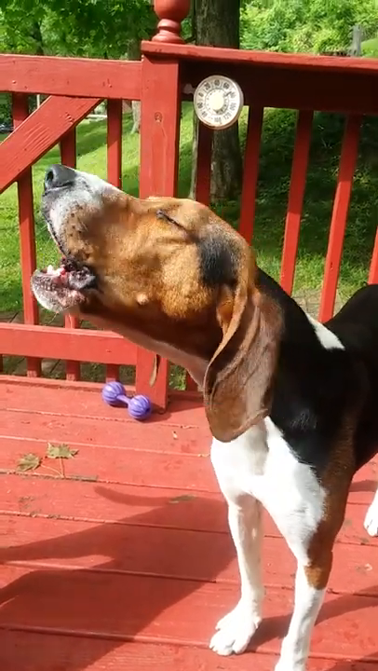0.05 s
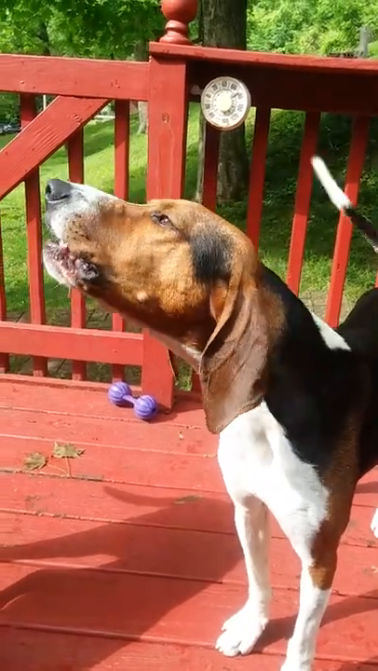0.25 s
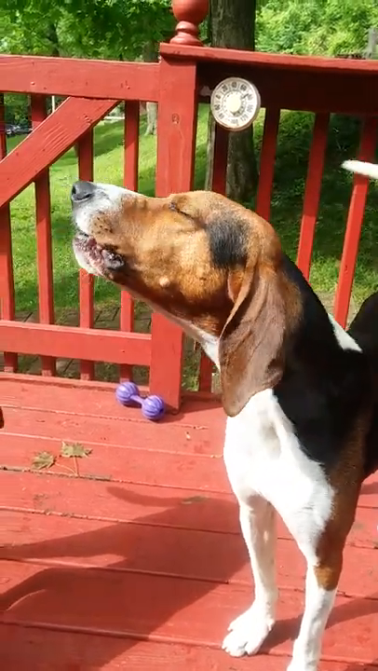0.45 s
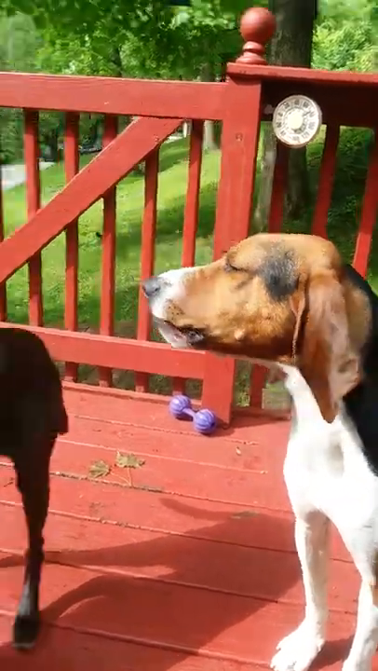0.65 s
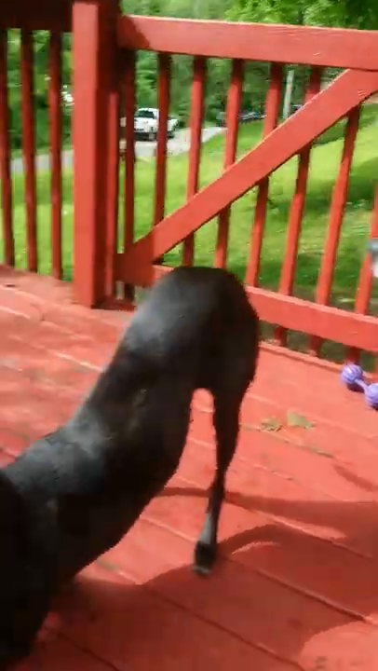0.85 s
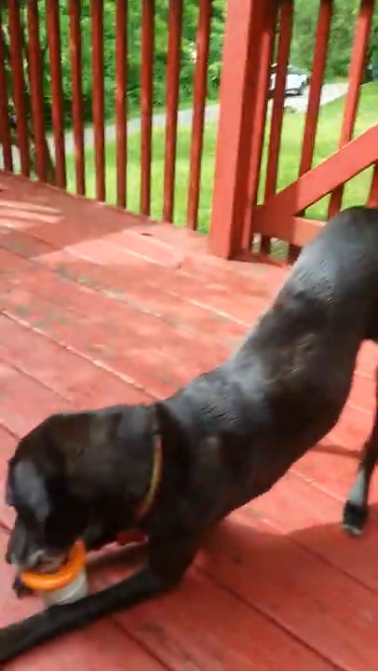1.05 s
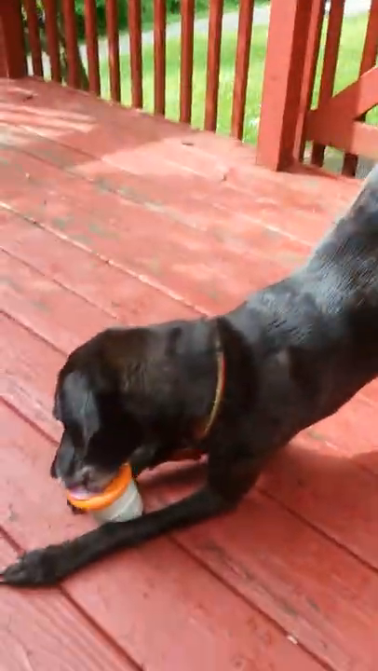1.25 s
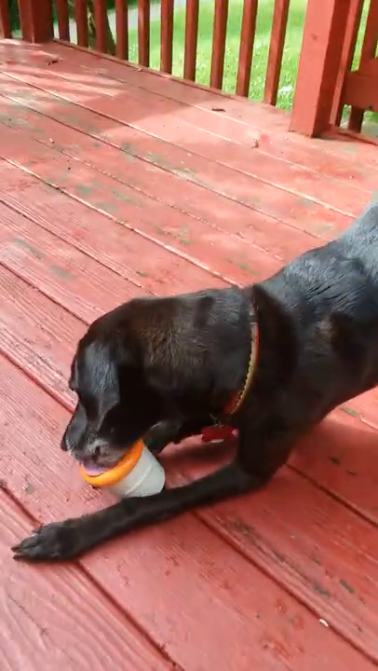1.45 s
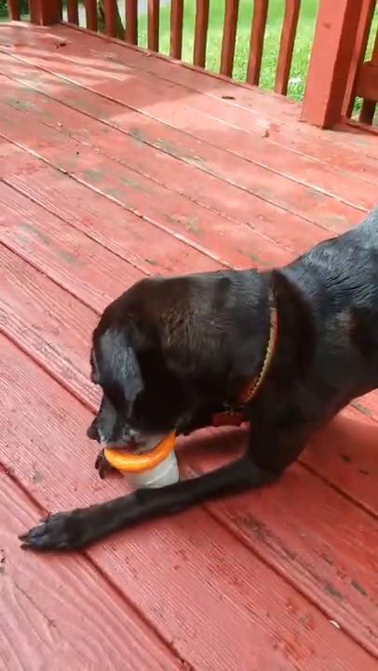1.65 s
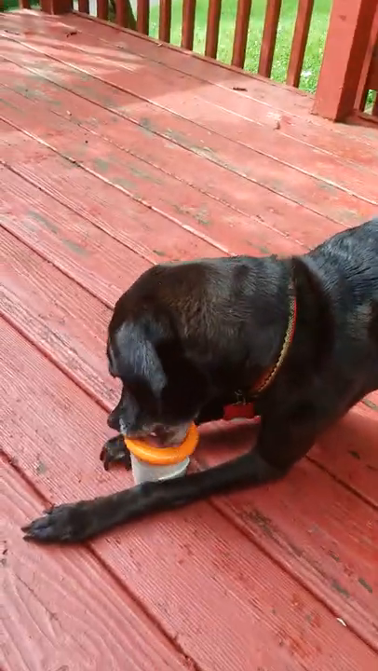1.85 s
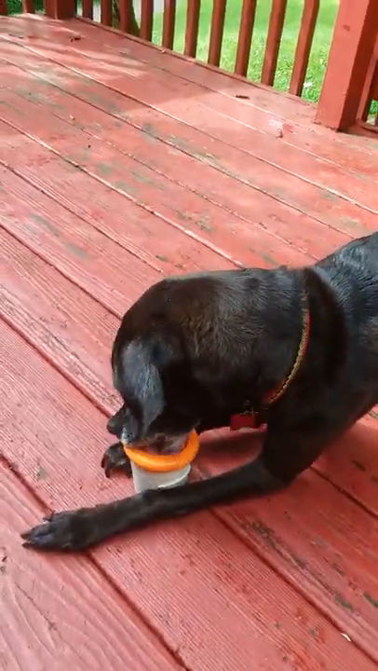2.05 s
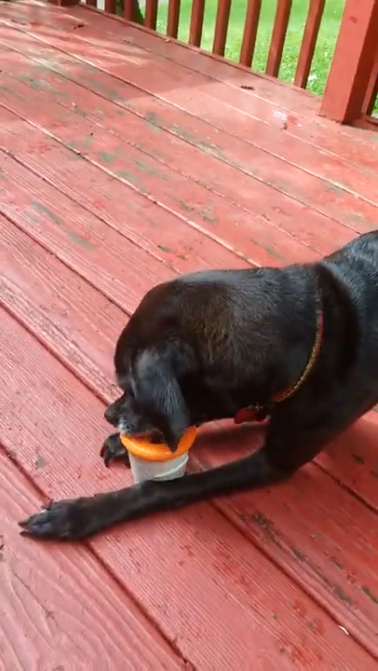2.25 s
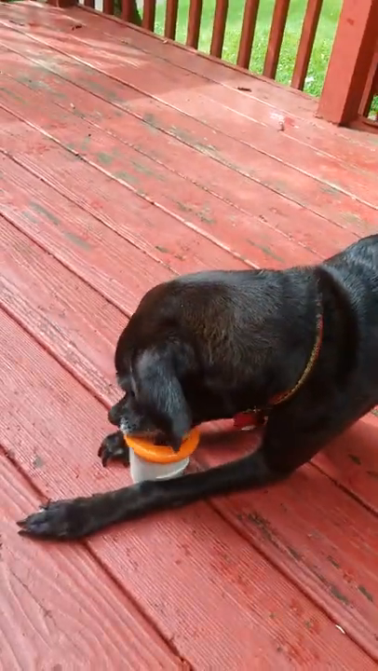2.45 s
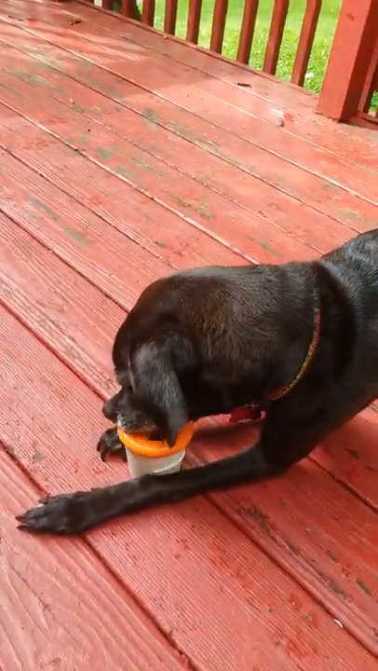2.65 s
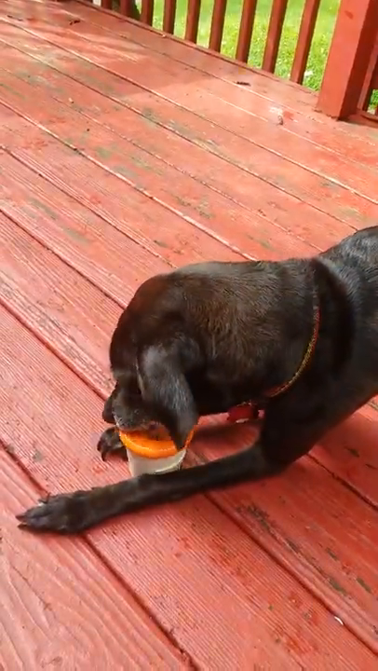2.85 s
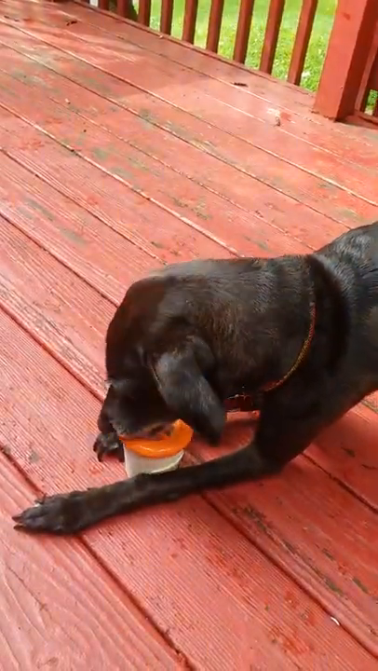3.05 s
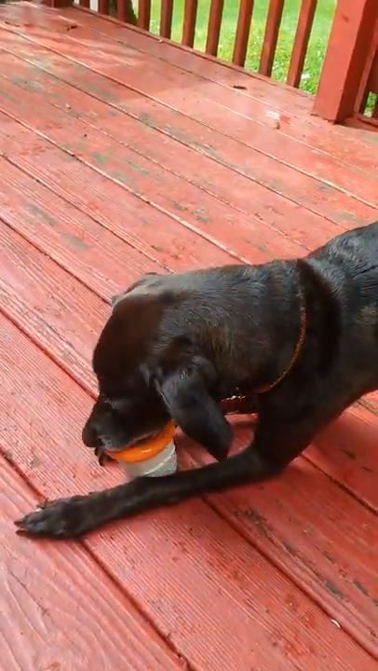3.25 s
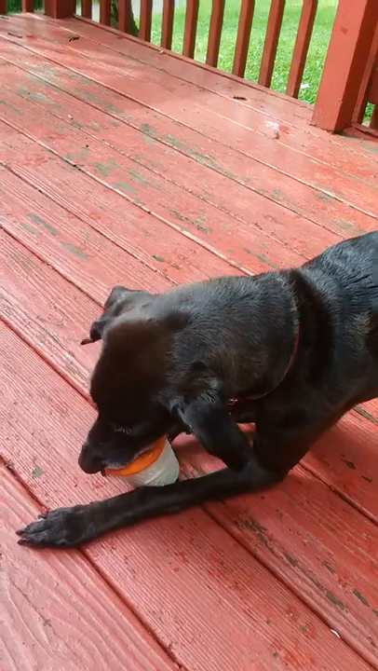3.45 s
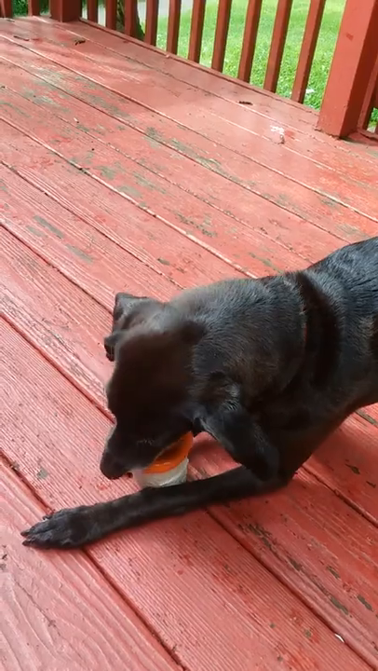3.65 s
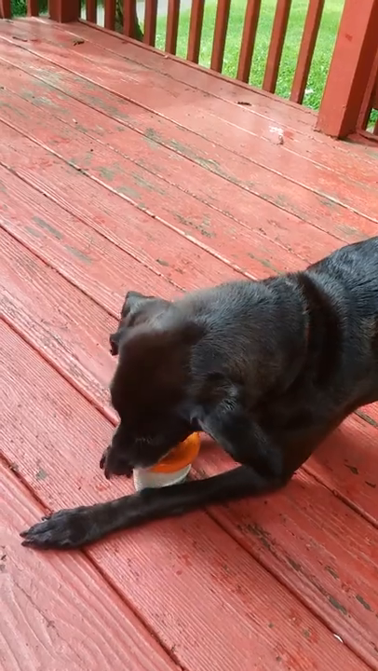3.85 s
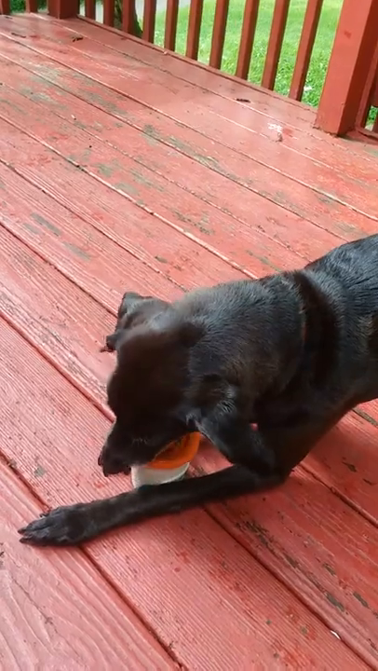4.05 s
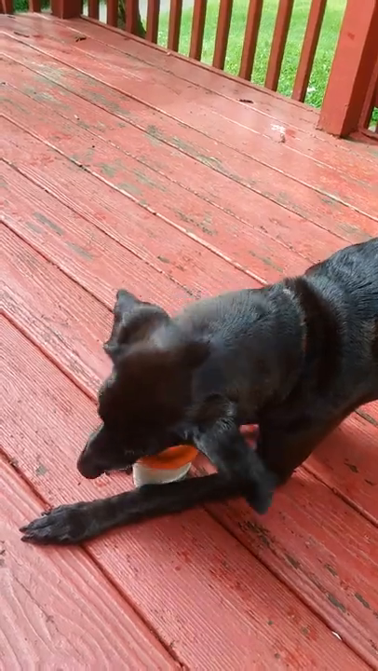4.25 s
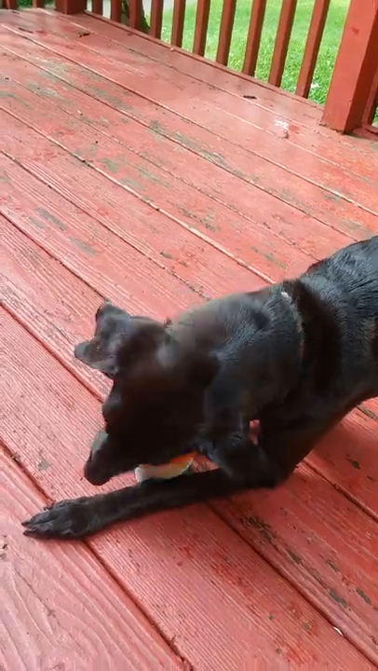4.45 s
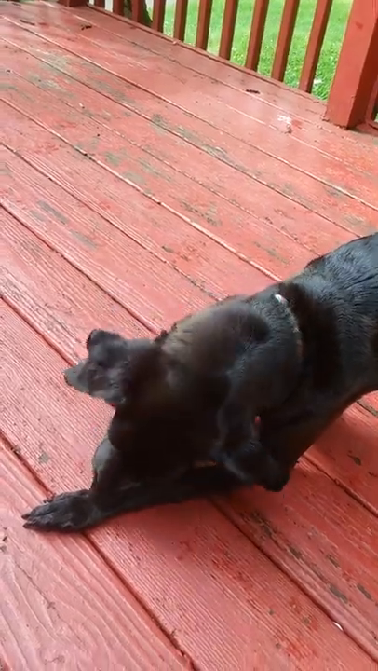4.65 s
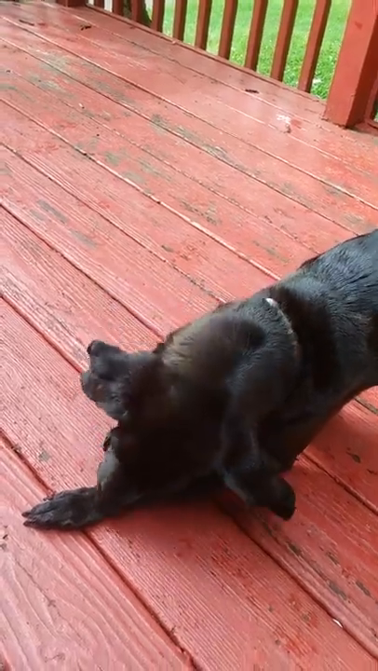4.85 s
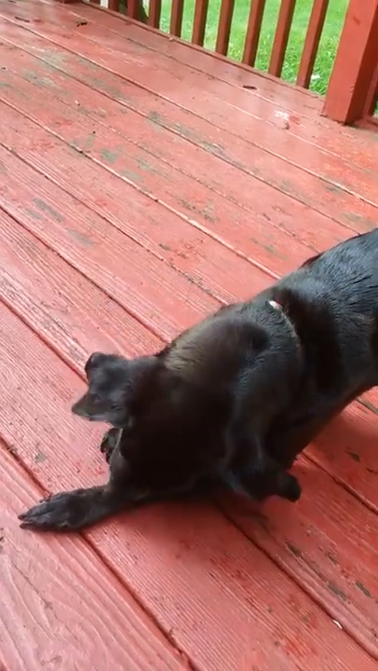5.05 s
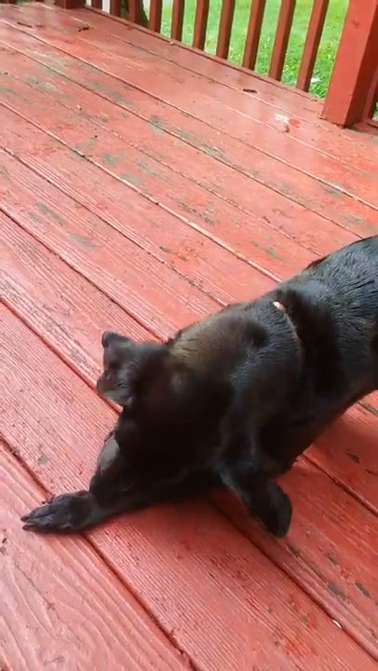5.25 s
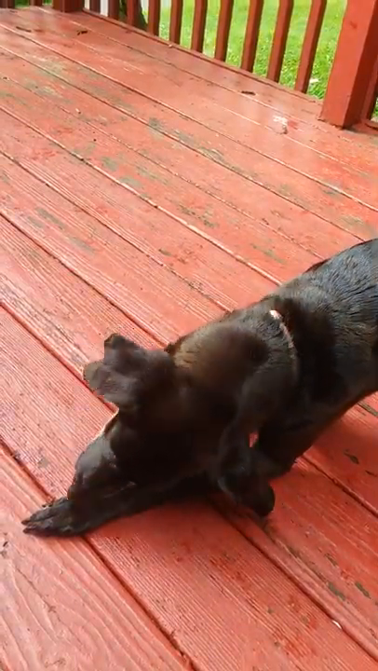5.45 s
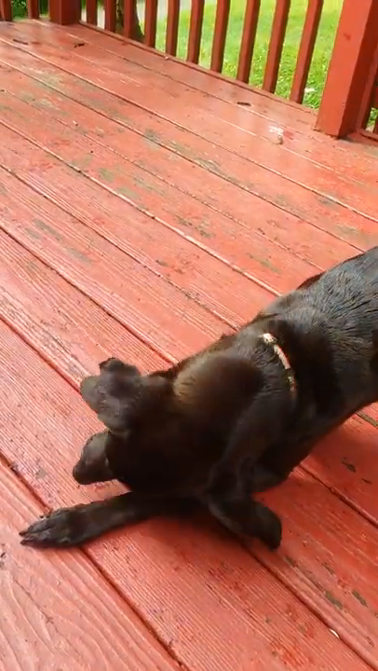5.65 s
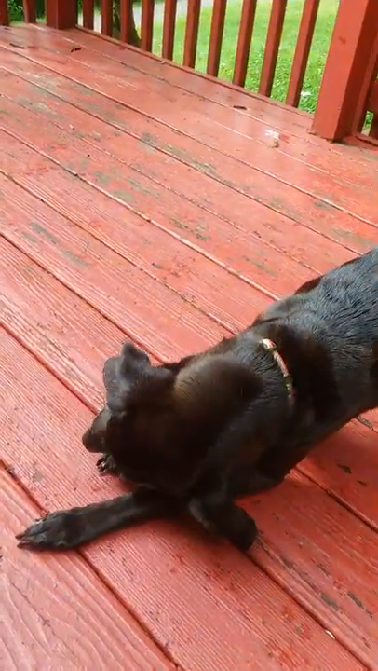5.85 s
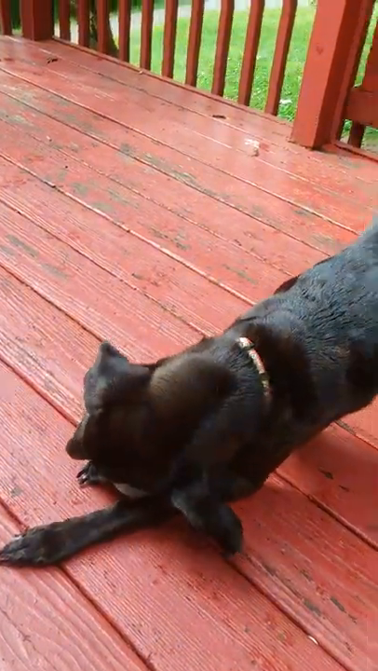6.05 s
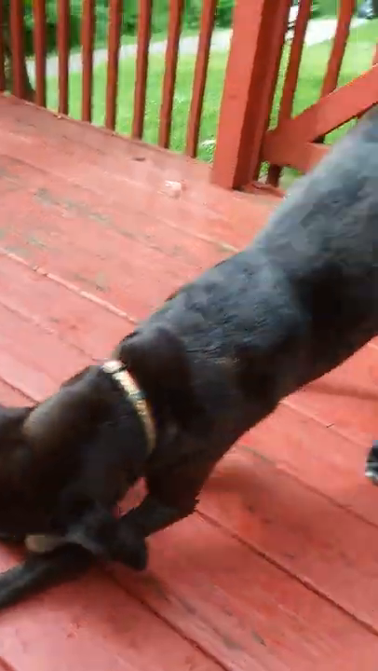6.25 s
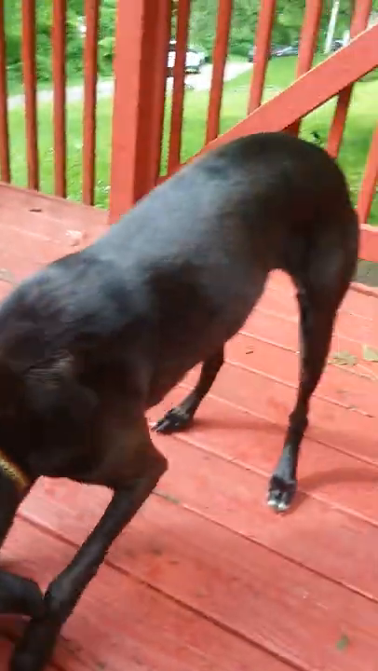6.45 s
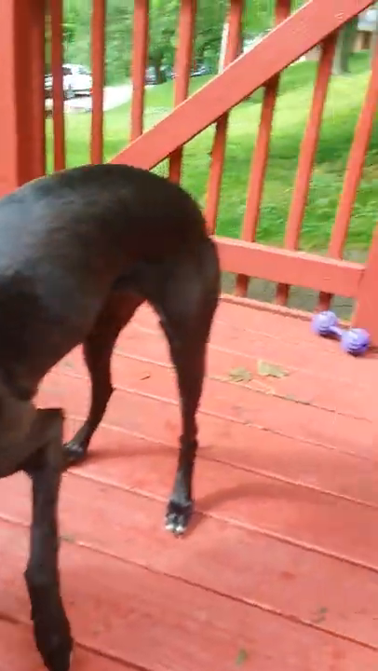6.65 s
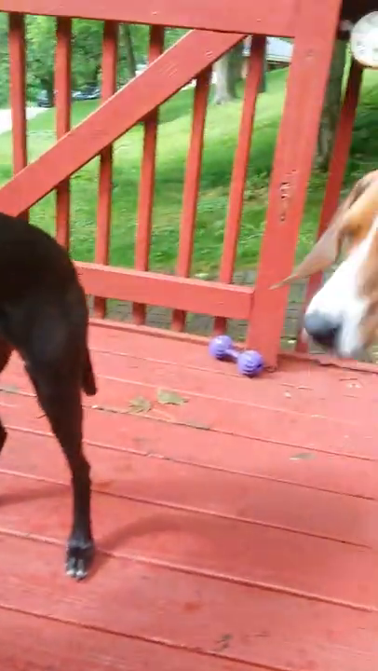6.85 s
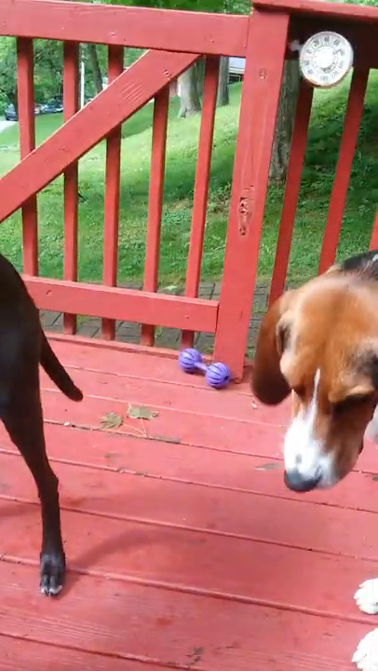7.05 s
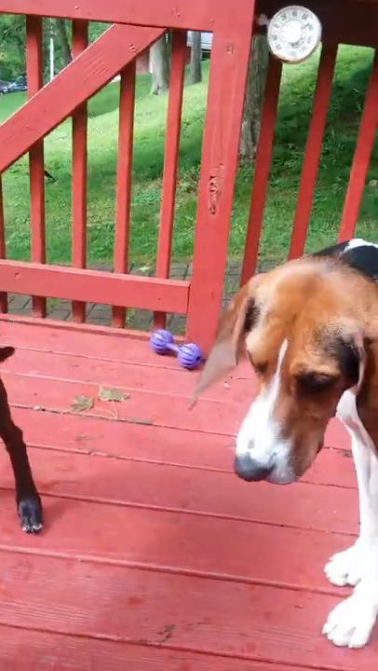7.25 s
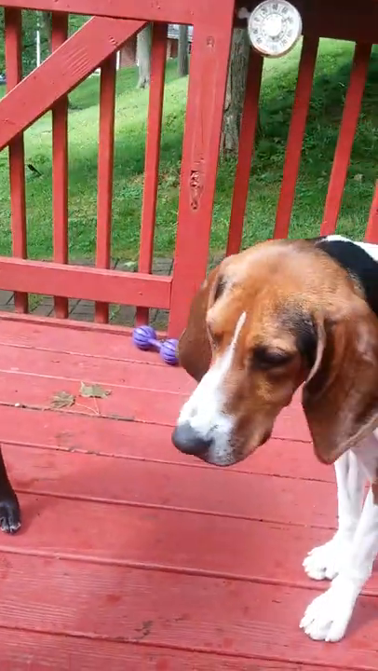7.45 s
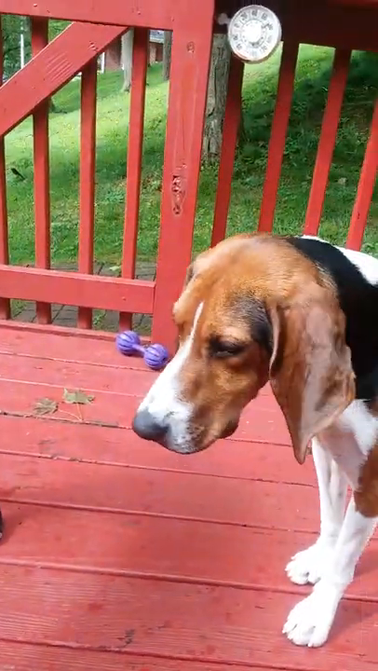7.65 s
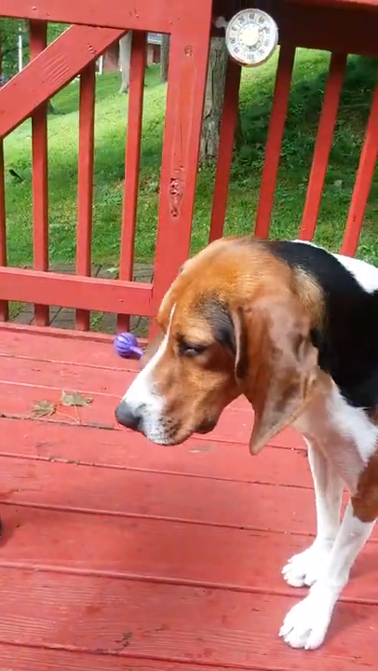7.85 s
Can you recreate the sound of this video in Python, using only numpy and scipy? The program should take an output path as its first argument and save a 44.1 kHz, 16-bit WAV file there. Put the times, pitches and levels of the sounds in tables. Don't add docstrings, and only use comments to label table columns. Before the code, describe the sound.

At 0 s a hound's loud bay, pitched around 410 Hz, is already under way very close; by 0.2 s it cracks into tiny squeaks and dies, leaving a faint tree echo. The automatic level keeps the yard low for about a second, then distant road rumble and wavering engine drone rise. Short falling bird chips repeat evenly until about 2.3 s, with rising chips, thin high seeps and echoing fluted phrases. Small claw ticks and woody knocks come at 0.8-1.5, 2.4-3.0, 4.0 and 4.4 s. Around 3.05 s a plastic cup scrapes and skips with a quick hollow rattle. At 4.5 s a raspy indrawn breath leads to the second bay at 4.72 s: wide and brassy, flipping into a rounded hoot near 5.05, breaking to a rough croak by 5.4. The yard stays ducked until about 6.3 s, then rumble and bird phrases return, at 6.7 and 7.4 s, to the end near 8 s.

```python
import sys
import numpy as np
from scipy import signal
from scipy.fft import rfft, irfft
from scipy.io import wavfile
from scipy.ndimage import uniform_filter1d, minimum_filter1d

SR = 44100
rng = np.random.default_rng(int(sys.argv[2]) if len(sys.argv) > 2 else 0)


def generate_wav(signal):
    frames = np.transpose(np.atleast_2d(signal))
    scaled = np.clip(frames, -1, 1) * 32767
    pcm = np.round(scaled).astype(np.int16)
    wavfile.write(sys.argv[1], SR, pcm)


def makeup_ratio(level_db):
    decades = np.asarray(level_db, float) / 20
    return 10 ** decades


N = 348831

# (frequency [Hz], level [dB])
THROAT = [(1650, 0), (2060, -10), (2470, -18), (2850, -34), (3300, -30), (4200, -44), (4950, -35),
          (5500, -34), (6200, -26), (7000, -38), (8000, -29), (9200, -47), (11000, -42), (13500, -38),
          (15700, -46)]
# (frequency [Hz], lead [rad])
PORT_LEADS = [
    [(100, 0), (410, .7), (820, .2), (1230, 1.8), (1640, 0), (2050, 1.8), (2500, 2.4), (5000, 1.5)],
    [(100, 0), (410, -.25), (820, 0), (1230, .9), (1640, 2.1), (2050, 1.9), (2500, 2.3), (5000, 1.5)],
]
# (frequency [Hz], ratio [dB])
PORT_BALANCES = [
    [(100, 0), (410, -2), (820, 0), (1230, 4), (1640, -1), (2050, 1), (2500, 7)],
    [(100, 0), (410, 0), (820, -1), (1230, -1), (1640, 1), (2050, 1), (2500, 3), (4000, 7), (9000, 4),
     (13000, 7)],
]
# (frequency [Hz], level re effort [dB])
WIDE_MOUTH = [(220, -8), (320, -14.5), (410, -8.5), (650, 3.5), (820, 4), (1000, 5), (1230, -2.5),
              (1640, -8.5)]
ROUNDED_MOUTH = [(220, -5.5), (450, 5), (900, -25.5), (1360, -22), (1800, -56)]
# (frequency [Hz], level re effort [dB])
ASIDE = [(450, -31.5), (900, -13), (1360, -10), (1800, -20.5)]
# (time [s], pitch [Hz], effort [dB], mouth opening [0-1], extra rasp [dB])
FIRST_BAY = [(0, 412.3, -11.5, 0.76, -1), (.045, 404, -13.5, .66, -1.5), (.07, 412.6, -14.5, .6, 0),
             (.096, 397.3, -16, 0.47, 0.5), (.128, 424.3, -14.5, 0.52, 2.5),
             (.157, 414.4, -17.5, 0.55, 4.5), (.172, 449, -17.5, 0.4, 5), (.184, 460, -18, 0.32, 0),
             (.192, 444, -30.5, 0.7, 11)]
BROKEN_TAIL = [(.2, 424, -24, 0.32, 14), (.213, 408.5, -32.5, 0.4, 17), (.225, 338.8, -39.5, 0.45, 20),
               (.275, 194.4, -53, 0.44, 20)]
SECOND_BAY = [(4.718, 329, -42.5, 1, 9), (4.733, 307.7, -15, 0.7, -3), (4.78, 373.5, -15.5, 0.7, -3),
              (4.819, 400, -13.5, .8, -5.5), (4.86, 413.9, -11.5, 0.9, -0.5), (4.93, 408.2, -10, 0.65, -3),
              (4.991, 410.7, -16, 0.6, -3.5), (5.03, 434, -13.5, 0.24, 2.5)]
HOOT = [(5.048, 436, -13, 0.058, 2), (5.058, 460, -10, 0.042, 2), (5.085, 452, -10.5, 0.037, 2.5),
        (5.1, 454.4, -10.5, 0.039, -3), (5.139, 442.6, -13.5, 0.059, 0.5), (5.19, 455.3, -13, 0.0588, -1.5),
        (5.24, 450.8, -13, 0.075, 2), (5.264, 440.3, -16, 0.085, 1)]
CROAK = [(5.276, 421.5, -24.5, 0.66, 3), (5.292, 397.5, -23, 0.39, 3), (5.325, 404.2, -22.5, 0.42, 2),
         (5.351, 410.8, -27.5, .5, 10), (5.378, 374, -38.5, 0.54, 12), (5.4, 270, -46, .55, 12),
         (5.435, 165, -48, 0.43, 12)]
# (time [s], jaw [dB], tongue [dB], palate [dB])
FIRST_VOWEL = [(0, -5.5, 0, -3.5), (.04, -4.5, -2.5, -0.5), (.07, 0.5, 2.5, -3), (.09, -2, -1, 5.5),
               (.125, -1.5, 1.5, -7.5), (.155, -1, -5, -3), (.18, -9.5, 7, 1.5), (.2, -2, -2, 11.5)]
SECOND_VOWEL = [(4.73, 1, -1.9, -1), (4.78, -6, 0.77, 5), (4.82, -5, -1.4, 3.5), (4.86, -2, -0.0026, 0),
                (4.92, 1, -2, 0.5), (4.99, 0, 0.5, -4), (5.04, -1.5, 0.13, -2)]
HOOT_VOWEL = [(5.06, 4, 0.5, 3.5), (5.09, -4.5, 3, -3.5), (5.15, 3, -0.5, -6), (5.2, 2, -3.5, -1.5),
              (5.26, 2.5, -4.5, -1), (5.29, -1.5, 5.5, -0.5), (5.325, -2.5, 5.5, -2.5), (5.36, 1, -8, 5.5)]
# (middle [s], half width [s], frequency [Hz], half width
# [Hz], lift [dB])
PASSING_BANDS = [(.07, 0.086, 5400, 250, 1.5), (.07, .1, 3330, 250, -0.5), (.1, .12, 4050, 250, -9),
                 (.1, .1, 6800, 200, -15.5), (.22, 0.026, 5960, 350, -0.5), (.21, .03, 8200, 400, 6.5),
                 (4.86, .13, 3550, 499, 11), (4.86, .13, 4866, 420, 19.5), (4.791, 0.032, 4610, 595, 7),
                 (4.87, .035, 6300, 400, 6.5), (5.02, .03, 3905, 500, 7), (5.07, 0.02, 6270, 504, 13),
                 (5.07, .016, 7630, 450, 12.5), (5.3, 0.023, 5760, 501, 4.5), (5.349, .014, 6170, 300, 10),
                 (5.35, 0.012, 7920, 502.4, 7), (5.4, 0.034, 2970, 201, 19)]
# (middle [s], half width [s], flutter [0-1])
FLUTTERS = [(.05, .09, .12), (.197, .01, .3), (.23, .03, .25), (4.72, .015, .3), (4.945, .04, .18),
            (5.01, .025, .07), (5.315, .04, .55), (5.41, .06, .4)]
# (middle [s], half width [s], share [0-1])
HALVING = (.07, .065, .1)
RASP_WIDE_DB, RASP_ROUNDED_DB, RASP_FLUTTER_DB = -31.5, -42.5, 8.5
CALM_FLUTTER, ASIDE_FLUTTER, HOOT_PATCHY = .015, 4.4, 1.2
DRAIN_DB, SOFT_DULL = -5, 0.48
TOP_DB, AIR_DB, AIR_SHARE, LOOSE_AIR_DB = 18, -1, .6, 1.5
SLAP_DB, RING_ON_DB, LOW_RING_DB = -29.5, -41, -41

# (frequency [Hz], level [dB per Hz])
ROAD = [(12, -73.5), (20, -46), (65, -25.5), (101, -18), (124, 0.5), (157, -2.5), (198, -17), (285, -13),
        (325, -23.5), (450, -25.5), (580, -52.5), (990, -120)]
WASH = [(200, -39), (300, -21), (400, -9), (550, -11.5), (700, -10.5), (900, -11), (1200, -13.5),
        (1500, -18), (1900, -24), (2600, -35.5), (5000, -68)]
HISS = [(1200, -27.5), (2300, -3.5), (3000, -4), (3600, -9.5), (4000, -11), (4400, -4.5), (4650, -5.5),
        (4900, -7), (5300, -16.5), (6000, -12.5), (7000, -13.5), (8000, -7), (9200, -19), (15500, -38),
        (16500, -60)]
AIR = [(7000, -36), (9500, -2.5), (12000, -3.5), (15500, -2.5), (16500, -32)]
# (frequency [Hz], coherence [0-1])
COHERENCE = [(60, .99), (180, .99), (300, .9), (520, .7), (890, .4), (1500, .1), (4000, .1)]
# (frequency [Hz], ratio [dB])
YARD_BALANCE = [(300, 0), (800, -2.5), (1700, 0), (2600, 4), (5000, 6.5), (9000, 4), (14000, 6.5)]
# (time [s], level [dB])
TRAFFIC = [(0, -34.5), (1.1, -43), (1.35, -32.5), (2.7, -34), (3.5, -34.5), (4.3, -36.5), (4.62, -35),
           (5.5, -30), (6.55, -37), (6.9, -36.5), (7.9, -39.5)]
WASH_DB, WASH_SHARE, HISS_DB, HISS_SHARE, AIR_LEVEL_DB = -51.5, 0.52, -79.5, 0.14, -75.5
# (bay start [s], bay end [s], duck [dB])
DUCKS = [
    (-.4, 0.222, 9),
    (4.723, 5.363, 20.5),
]
GRAB_S, HOLD_S, CREEP_DB, LET_GO_S = 0.048, 0.88, 7.5, 0.313
# (loudest [s], half width [s], frequency [Hz], level [dB])
DRONES = [(1.7, 1.2, 123.8, -41), (3.8, 0.67, 118.4, -41), (2.6, 3, 96.9, -47.5), (3.2, 0.22, 140, -41),
          (1.1, 0.5, 120, -55.5), (5.66, 1.4, 161.5, -41), (9.1, 2, 77, -57), (9.2, 1.2, 61, -49),
          (2.3, 1.5, 70, -63.5),
          (1.5, .5, 312, -57), (2.7, .8, 328, -57), (2, .6, 383, -61), (3.9, .6, 415, -62),
                (3.3, .8, 268, -57), (1.6, .5, 216, -53), (1.7, .5, 168, -46)]

# (time [s], length [s], start [Hz], end [Hz], level [dB])
THRUSH_GLIDES = [(.84, 0.024, 2950, 2876, -56.5), (1.04, 0.033, 2680, 2607, -57),
                 (1.5, 0.12, 2990, 4090, -66), (3.02, 0.031, 2790, 2702, -49),
                 (3.08, 0.0175, 2798, 2870, -43), (3.15, .09, 2414, 2640, -57.5),
                 (3.225, 0.087, 2650, 2767, -53),
                 (6.001, .0416, 2920, 3230, -68), (1.3, .2, 5600, 5400, -77)]
SEEP_GLIDES = [(.52, 0.14, 7920, 7680, -71.5), (.64, 0.31, 7640, 7430, -69.5),
               (2.065, 0.11, 7830, 6730, -67), (2.19, 0.096, 7190, 8370, -71.5),
               (2.37, 0.06, 8130, 6630, -64.5), (2.5, 0.054, 7450, 7000, -68),
               (3.95, 0.18, 5770, 5500, -76), (4.35, 0.17, 7700, 7790, -69), (4.48, 0.27, 7650, 7520, -67)]
STRAIGHT_SEEPS = [(3.75, 0.14, 5900, 7340, -70.5), (6.03, 0.11, 5790, 6860, -85),
                  (6.2, .3, 5590, 5280, -83.5)]
CLEAR_GLIDES = [(2.25, 0.2, 2320, 3470, -62.5), (5.57, 0.21, 4990, 3755, -75.5),
                (6.035, 0.083, 3075, 2215, -62.5), (6.145, 0.082, 2900, 2030, -61.5),
                (7.089, 0.12, 2585, 3430, -68)]
CLEAR_LIFTS = [(6.24, .07, 3250, 3980, -73), (0.97, 0.031, 2950, 2600, -69)]
# (time in phrase [s], length [s], start [Hz], end [Hz], relative level [dB])
HIGH_LOW_GLIDES = [(-.005, .1, 3740, 3370, -2.5), (.085, 0.028, 3400, 2750, 3.5),
                   (.105, .035, 2763, 2384, -2.5), (.15, .06, 2790, 2540, 2), (.2, .17, 2570, 2520, -6.5),
                   (.09, .16, 3520, 3480, -8.5)]
FALL_AND_LIFT = [(.098, 0.015, 3340, 3220, -6.5), (0.111, .03, 3250, 2630, 1), (.14, .055, 2900, 2120, -1),
                 (.2, .05, 2400, 2736, -10)]
FALLING_CHIP = [(0, .018, 3550, 3200, .5), (.016, .02, 3250, 3450, -4)]
# (time in phrase [s], length [s], foot [Hz], top [Hz], relative level [dB])
OPENING_ARCH = [(-.01, 0.08, 2080, 2530, .5)]
# (time [s], level [dB])
HIGH_LOW_AT = [(.165, -66.5), (2.426, -53.5), (4.168, -50), (7.359, -51.5)]
ARCH_FALL_AT = [(3.645, -51.5), (5.438, -66), (6.739, -50.5)]
FALLING_CHIP_AT = [(0.284, -59), (.565, -62.5), (.85, -61), (1.131, -57.5), (1.415, -52.5), (1.7, -55),
                   (1.97, -55), (2.259, -56)]
# (time [s], length [s], foot [Hz], top [Hz], level [dB])
THRUSH_ARCHES = [(.895, 0.073, 2426, 2524, -61), (3.1, 0.039, 2344, 2460, -49),
                 (6.13, 0.031, 2950, 3170, -61.5)]
CHIP_ARCHES = [(.475, 0.037, 1820, 1845, -62.5), (1.06, 0.037, 1920, 1840, -60)]
SQUEAKS = [(.194, 0.033, 2760, 2900, -47), (.194, 0.02, 2430, 2534, -41.5), (.215, 0.036, 2900, 3060, -55)]
# (time [s], length [s], middle [Hz], level [dB])
CHIP_SWEEPS = [(1.28, 0.066, 1665, -57), (1.6, 0.086, 1990, -61), (1.89, 0.055, 2094, -56),
               (2.17, 0.058, 1990, -57.5)]
SWEEP_SHARE = 0.179
THRUSH_SAG, SEEP_SAG, CLEAR_SAG = 0.19, 0.42, 0.25

# (time [s], peak [dB], ring [Hz], T60 [s], tick [dB])
KNOCKS = [(0.787, -43, 740, 0.008, -64), (1.088, -61, 4200, .006, -55), (1.2, -51, 1140, 0.026, -66),
          (2.67, -49, 1850, .012, -61), (1.156, -50, 1150, 0.021, -66), (1.339, -50, 1210, 0.018, -55),
          (1.475, -46, 570, 0.04, -59.5), (2.369, -50, 797, 0.021, -54.5), (2.514, -46, 900, 0.018, -53.5),
          (2.988, -39.5, 790, 0.014, -46), (3.978, -45, 820, 0.04, -57), (4.407, -41.5, 483, 0.02, -71.5)]
# (time [s], level [dB])
DRAG = [
    (3.04, -44),
    (3.056, -31),
    (3.14, -43.5),
]
DRAW = [(4.47, -56), (4.51, -51.5), (4.54, -44.5), (4.6, -42.5), (4.65, -40), (4.675, -53.5),
        (4.712, -56.5)]
# (frequency [Hz], level [dB per Hz])
DRAG_COLOUR = [(300, -35), (600, -11.5), (910, -7), (1500, -10), (3000, -24), (4200, -34), (12000, -54)]
DRAW_COLOUR = [(250, -38), (450, -6.5), (640, 2.5), (850, -10), (1200, -8), (1550, -17.5), (1880, -8),
               (2200, -22.5), (2600, -22.5), (6000, -48)]
# (time [s], level [dB])
SKIPS = [
    (3.046, -42),
    (3.054, -27.5),
    (3.066, -35),
    (3.071, -37),
    (3.082, -41),
    (3.094, -34),
    (3.101, -38.5),
]
# (frequency [Hz], level [dB], T60 [s])
CUP_MODES = [(934, -12.5, 0.06), (927, 2, 0.046), (1400, -1.5, 0.037), (1763, -11.5, 0.075),
             (2204, -3, 0.034), (2900, -13, .025)]


def evened(x):
    return x / np.sqrt(np.mean(abs(x) ** 2) + 1e-20)


def read(points, hz):
    f, value = np.transpose(points)
    return np.interp(np.log(hz + 1), np.log(f + 1), value)


def add(mix, start_s, sound):
    part = mix[round(start_s * SR):][:len(sound)]
    part += sound[:len(part)]


def slow(n, span):
    once = uniform_filter1d(rng.standard_normal(n), int(span))
    return evened(uniform_filter1d(once, int(span)))


def coloured(x, points):
    gain = makeup_ratio(read(points, np.fft.rfftfreq(len(x), 1 / SR)))
    return evened(irfft(rfft(x) * gain, len(x)))


def ports(x, lead, balance):
    hz = np.fft.rfftfreq(N, 1 / SR)
    ratio = makeup_ratio(read(balance, hz)) * np.exp(1j * np.clip(read(lead, hz), -2.5, 2.5))
    side = irfft(rfft(x) * (ratio - 1) / (ratio + 1), N)
    return np.array([x + side, x - side])


def trees(x, t60_s, gap_s):
    t = np.arange(SR) / SR
    sign = rng.choice([-1., 1.], (2, SR))
    hit = rng.random((2, SR)) < .05
    taps = sign * hit * makeup_ratio(-60 * t / t60_s) * (t > gap_s)
    return signal.fftconvolve(x[None], taps / np.linalg.norm(taps[0]), axes=1)[:, :N]


def passing_lift(rings, t, hz):
    return sum(db * np.exp(-((t - at) / span) ** 2 - ((hz - f) / half) ** 2)
               for at, span, f, half, db in rings)


def rasping_air(turn, rasp_db, rings, start_s):
    puffs = (0.57 + np.cos(turn / 2) ** 4) * rng.standard_normal((2, len(turn)))
    air = [coloured(puff, [(250, -47.5), (1400, -7.5)] + THROAT[1:]) for puff in puffs]
    f, at, z = signal.stft(air, SR, nperseg=256)
    z = z * makeup_ratio(AIR_SHARE * passing_lift(rings, at + start_s, f[:, None]))
    return makeup_ratio(rasp_db + AIR_DB) * signal.istft(z, SR, nperseg=256)[1][:, :len(turn)]


def bay(rows, vowel, flutter_hz, skew, dull_db):
    s, *columns = np.transpose(rows)
    t = np.arange(s[0], s[-1], 1 / SR)
    n = len(t)
    hz, effort_db, mouth, extra_db = (np.interp(t, s, c) for c in columns)
    mouth = np.clip(mouth, 0, 1)
    rounded = (1 - mouth) ** 2
    vowel_s, *lifts = np.transpose(vowel)
    lift_db = dict(zip([2, 3, 4], (np.interp(t, vowel_s, c) for c in lifts)))
    rings = [ring for ring in PASSING_BANDS if s[0] < ring[0] < s[-1]]

    flutter = CALM_FLUTTER * np.minimum(1, .25 + 2 * mouth)
    flutter += sum(share * np.exp(-((t - at) / half) ** 2) for at, half, share in FLUTTERS)
    openness = mouth ** 2 * makeup_ratio(RASP_WIDE_DB) + makeup_ratio(RASP_ROUNDED_DB)
    rasp_db = effort_db + 20 * np.log10(openness) + RASP_FLUTTER_DB * flutter + extra_db

    low_db = {}
    for k in range(1, 5):
        wide, hooted = makeup_ratio(read(WIDE_MOUTH, k * hz)), makeup_ratio(read(ROUNDED_MOUTH, k * hz))
        low_db[k] = effort_db + 20 * np.log10(mouth * wide + (1 - mouth) * hooted)
        low_db[k] += (dull_db + SOFT_DULL * np.minimum(effort_db + 20.0, 0)) * max(k - 2, 0)
        low_db[k] += DRAIN_DB * flutter * (k == 2) + lift_db.get(k, 0)

    turn = 2 * np.pi * np.cumsum(hz * (1 + 0.0035 * slow(n, 290))) / SR
    flap = np.exp(2j * np.pi * np.cumsum(flutter_hz * (1 + 0.51 * slow(n, 400))) / SR)
    chaos = slow(n, 82) + 1j * slow(n, 54)
    middle_s, half_s, half_share = HALVING
    halves = half_share * np.exp(-((t - middle_s) / half_s) ** 4 + .4 * slow(n, 500) + 1j * turn / 2)

    sound, aside = np.zeros((2, n))
    for k in range(1, 54):
        sidebands = np.exp(2.1j * k) * flap + 0.071 / flap + 0.38 * flap ** 2
        shake = 1 + halves + flutter * (sidebands + 0.08 * min(k, 4) * np.roll(chaos, 900 * k))
        high = np.clip((k * hz - 2100) / 1200, 0, 1)
        if k < 5:
            patchy = 1 + HOOT_PATCHY * rounded * max(k - 2, 0)
            level_db = low_db[k] + .35 * k * patchy * slow(n, 900)
        else:
            level_db = read(THROAT, k * hz) + high * (rasp_db + TOP_DB)
            level_db += (1 - high) * (low_db[4] - read(THROAT, 4 * hz))
            level_db += passing_lift(rings, t[::64], k * hz[::64]).repeat(64)[:n]
            level_db += (2.2 + 2.5 * high * rounded) * slow(n, 1000) - 4 * high * rounded ** 2
        wander = .045 * k * high * np.minimum(1, .6 + 2 * mouth) * slow(n, 60)
        wander += 3 * flutter * np.sin(k * k)
        sound += np.sqrt(2) * (makeup_ratio(level_db) * shake * np.exp(1j * (k * turn + skew + wander))).real
        if k < 5:
            share = rounded * (1 + ASIDE_FLUTTER * flutter * (4 - k) ** 2)
            aside_amp = share * makeup_ratio(effort_db + read(ASIDE, k * hz))
            aside += np.sqrt(2) * aside_amp * (shake * np.exp(1j * k * (turn + 1))).real

    air = rasping_air(turn, rasp_db, rings, s[0])
    sound += air[0]
    loose_band = signal.butter(2, 2600, "high", fs=SR, output="sos")
    loose = makeup_ratio(LOOSE_AIR_DB) * signal.sosfilt(loose_band, air[1])
    sound = signal.sosfiltfilt(signal.butter(4, 205, "high", fs=SR, output="sos"), sound)
    fade_in = np.minimum(1, (t - s[0]) / 0.0032 + 0.12 * (s[0] == 0))
    fade_out = np.minimum(1, (s[-1] - t) / 0.015)
    return np.array([sound, aside, loose]) * fade_out * fade_in


def hound():
    out = np.zeros((2, N))
    first = bay(FIRST_BAY + BROKEN_TAIL, FIRST_VOWEL, flutter_hz=110, skew=0, dull_db=-3.5)
    second = bay(SECOND_BAY + HOOT + CROAK, SECOND_VOWEL + HOOT_VOWEL, flutter_hz=88, skew=1, dull_db=0.5)
    starts_s = [FIRST_BAY[0][0], SECOND_BAY[0][0]]
    for start_s, sounds, aside_db, lead, balance in zip(
            starts_s, [first, second], [-12, -.1], PORT_LEADS, PORT_BALANCES):
        tracks = np.zeros((3, N))
        for track, sound in zip(tracks, sounds):
            add(track, start_s, sound)
        voice, aside, loose = tracks
        out += ports(voice, lead, balance) + (makeup_ratio(aside_db) * aside + loose) * [[1], [-1]]
    carried = uniform_filter1d(np.diff(out[0], prepend=0) * 10, size=12)
    low_ring = makeup_ratio(LOW_RING_DB) * trees(out[0], t60_s=.9, gap_s=.05)
    slap = makeup_ratio(SLAP_DB) * trees(carried, t60_s=0.35, gap_s=0.0086)
    ring_on = makeup_ratio(RING_ON_DB) * trees(carried, t60_s=1.2, gap_s=.03)
    return out + low_ring + slap + ring_on


def ducking(t):
    gain_db = 0
    for start, end, db in DUCKS:
        times_s = [start, start + GRAB_S, end, end + HOLD_S, end + HOLD_S + LET_GO_S]
        gain_db = gain_db + np.interp(t, times_s, [0, -.75 * db, -db, CREEP_DB - db, 0])
    return gain_db


def yard():
    frames, hz = N // 256 + 5, np.fft.rfftfreq(1024, 1 / SR)
    t = np.arange(frames) * 256 / SR - 256 / SR
    road_db = np.interp(t, *np.transpose(TRAFFIC))
    swell_db = road_db - road_db.mean()
    wash_db = WASH_DB + WASH_SHARE * swell_db
    hiss_db = HISS_DB + HISS_SHARE * swell_db
    levels_db = np.array([road_db, wash_db, hiss_db, AIR_LEVEL_DB + 0 * t])
    levels_db = levels_db + ducking(t) * [[.99], [.95], [.75], [1.2]]
    bands_hz = [(60, 220), (500, 1200), (9000, 15000), (9000, 15000)]
    power = 0
    for colour, level_db, band in zip([ROAD, WASH, HISS, AIR], levels_db, bands_hz):
        shape = makeup_ratio(read(colour, hz)) ** 2
        shape = shape / shape[(hz > band[0]) & (hz < band[1])].sum()
        power = power + shape[:, None] * makeup_ratio(level_db) ** 2
    a, b, c, d, patches = rng.standard_normal((frames, 513, 5)).T
    patches = evened(uniform_filter1d(uniform_filter1d(patches, 10, 0), 14, 1))
    same = np.clip(read(COHERENCE, hz), -1, 1)[:, None]
    left = a + 1j * b
    right = same * left + np.sqrt(1 - same ** 2) * (c + 1j * d)
    tilt = makeup_ratio(read(YARD_BALANCE, hz) / 2)[:, None]
    z = np.array([left * tilt, right / tilt])
    z *= np.sqrt(power * 2 / (1 + same)) * makeup_ratio(0.22 * patches + 0.19 * slow(frames, 4.1) - 5.5)
    return signal.istft(z, nperseg=1024, noverlap=768)[1][:, :N]


def drones(t):
    out = 0
    for at, half, hz, db in DRONES:
        coarse = [slow(N // 100 + 1, 40), slow(N // 100 + 1, 60)]
        sway_db, slip = np.repeat(coarse, 100, axis=1)[:, :N]
        swell = makeup_ratio(db + 1.5 + 1.2 * sway_db) * np.exp(-((t - at) / half) ** 2)
        out = out + swell * np.cos(2 * np.pi * hz * t + 0.39 * slip)
    return uniform_filter1d(out, size=30) * makeup_ratio(ducking(t))


def repeated(notes, times):
    return [(s + at, *shape, db + level_db) for at, level_db in times for s, *shape, db in notes]


def glides(rows, sag):
    return [(s, length, a, (a + b) / 2 - sag * abs(b - a), b, db) for s, length, a, b, db in rows]


def arches(rows):
    return [(s, length, foot, top, foot, db) for s, length, foot, top, db in rows]


def whistles(notes, t60_s, wet_db, pan_db, gap_s=.022):
    song = np.zeros(N)
    for s, length, *hz, db in notes:
        u = np.linspace(0, 1, round(length * SR))
        pitch = np.polyval(np.polyfit([0, 1 / 2, 1], hz, deg=2), u)
        pitch = pitch * (1 + .006 * slow(len(u), 90))
        tone = np.sqrt(2) * np.sin(2 * np.pi * np.cumsum(pitch) / SR)
        add(song, s, makeup_ratio(db) * tone * signal.windows.tukey(len(u), .35))
    late = np.roll(song, 8)
    wet = makeup_ratio(wet_db) * trees(song, t60_s, gap_s)
    return makeup_ratio([[pan_db], [-pan_db]]) * (np.array([song, late]) + wet)


def thrush():
    notes = glides(THRUSH_GLIDES, THRUSH_SAG) + arches(THRUSH_ARCHES)
    notes += repeated(glides(HIGH_LOW_GLIDES, THRUSH_SAG), HIGH_LOW_AT)
    notes += repeated(arches(OPENING_ARCH) + glides(FALL_AND_LIFT, 0), ARCH_FALL_AT)
    return whistles(notes, 0.86, wet_db=1.6, pan_db=3.5, gap_s=0.0088)


def squeaks():
    return whistles(arches(SQUEAKS), 0.094, wet_db=-8.5, pan_db=7.0, gap_s=0.013)


def falling_chips():
    notes = repeated(glides(FALLING_CHIP, 0), FALLING_CHIP_AT)
    return whistles(notes, 0.18, wet_db=-2, pan_db=1.0, gap_s=0.0047)


def rising_chips():
    notes = [(s, length, hz * (1 - SWEEP_SHARE), hz, hz * (1 + SWEEP_SHARE), db)
             for s, length, hz, db in CHIP_SWEEPS]
    return whistles(notes + arches(CHIP_ARCHES), 0.39, wet_db=-5.0, pan_db=3.5)


def seeps():
    notes = glides(SEEP_GLIDES, SEEP_SAG) + glides(STRAIGHT_SEEPS, 0)
    return whistles(notes, 0.72, wet_db=4.0, pan_db=2.5)


def knocks():
    out, t = np.zeros(N), np.arange(2000) / SR
    for s, db, hz, t60_s, tick_db in KNOCKS:
        ring = np.sin(2 * np.pi * hz * t) + 0.36 * np.sin(2 * np.pi * 3.6 * hz * t)
        ring *= makeup_ratio(db + 4.5 - 60 * t / t60_s) * np.minimum(1, t / 0.00085)
        tick = uniform_filter1d(2.2 * rng.standard_normal(len(t)), size=3) * np.exp(-t / 0.0012)
        add(out, s, ring + makeup_ratio(tick_db) * tick)
    return out


def clear_whistles():
    notes = glides(CLEAR_GLIDES, CLEAR_SAG) + glides(CLEAR_LIFTS, 0)
    return whistles(notes, 1.0, wet_db=-1.5, pan_db=4.5)


def rasp(rows, colour, slips_per_s):
    s, db = np.transpose(rows)
    t = np.arange(s[0], s[-1], 1 / SR)
    slips = rng.standard_normal(len(t)) * (0.11 + (rng.random(len(t)) < slips_per_s / SR))
    level = makeup_ratio(np.interp(t, s, db)) * signal.windows.tukey(len(t), .2)
    out = np.zeros(N)
    add(out, s[0], level * coloured(slips, colour))
    return out


def cup():
    out, t = np.zeros(N), np.arange(2500) / SR
    for s, db in SKIPS:
        ring = 0
        for hz, mode_db, t60_s in CUP_MODES:
            chance = rng.standard_normal()
            decay = makeup_ratio(mode_db + 3.3 * chance - 60 * t / t60_s)
            ring = ring + decay * np.sin(2 * np.pi * hz * (1 + 0.018 * chance) * t)
        add(out, s, makeup_ratio(db) * ring * np.minimum(1, t / 0.0022))
    return out


def scene():
    song = thrush() + falling_chips() + rising_chips() + seeps() + clear_whistles()
    drag = makeup_ratio(-8.5) * rasp(DRAG, DRAG_COLOUR, slips_per_s=300)
    draw = rasp(DRAW, DRAW_COLOUR, slips_per_s=3200)
    deck = ports(knocks() + drag + cup() + draw, PORT_LEADS[1], PORT_BALANCES[1])
    return hound() + squeaks() + yard() + drones(np.arange(N) / SR) + song + deck


def top_cut(x):
    return signal.sosfilt(signal.butter(12, 15730, fs=SR, output="sos"), x)


def record(dry):
    room = minimum_filter1d(np.minimum(1, 1.0 / (abs(dry).max(0) + 1e-9)), size=801)
    held = np.clip(dry * uniform_filter1d(room, size=401), -.955, .955)
    return top_cut(held)


dry = scene()
out = record(dry)
generate_wav(out)
```